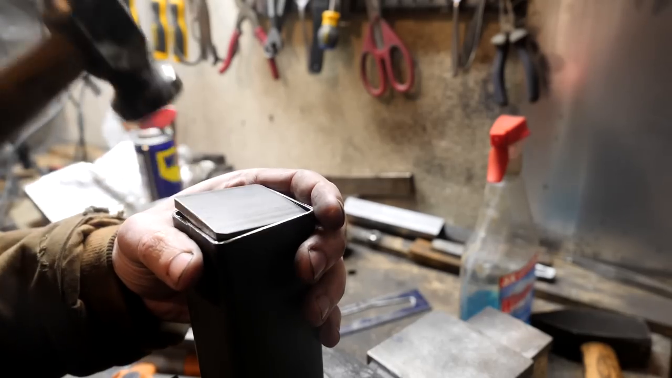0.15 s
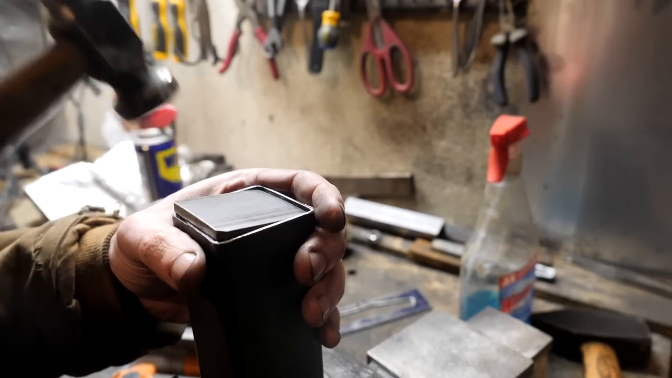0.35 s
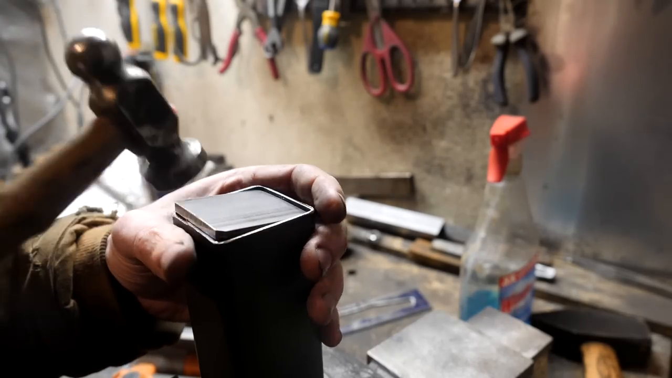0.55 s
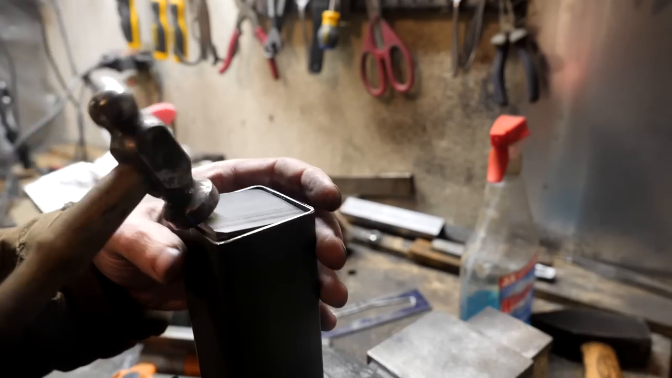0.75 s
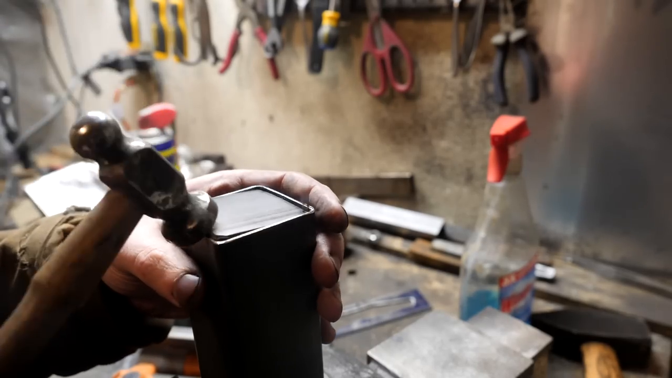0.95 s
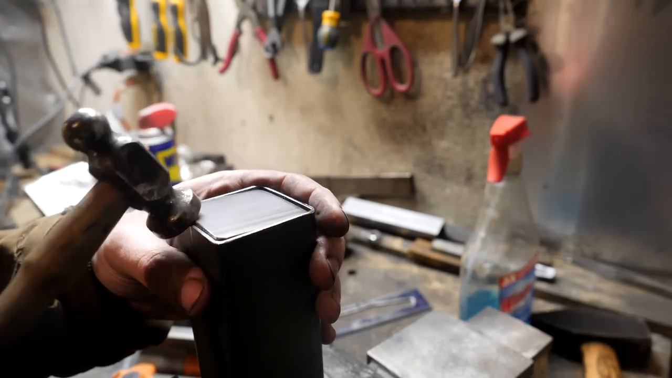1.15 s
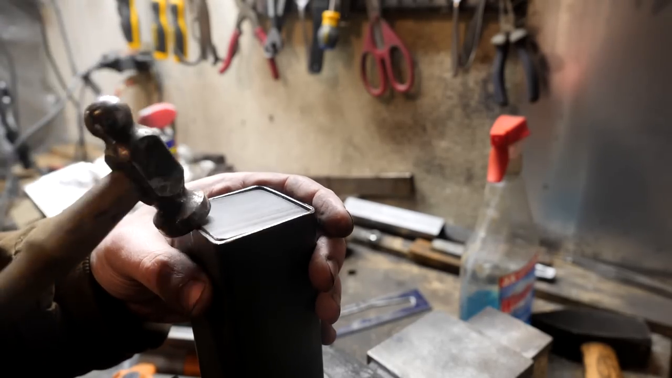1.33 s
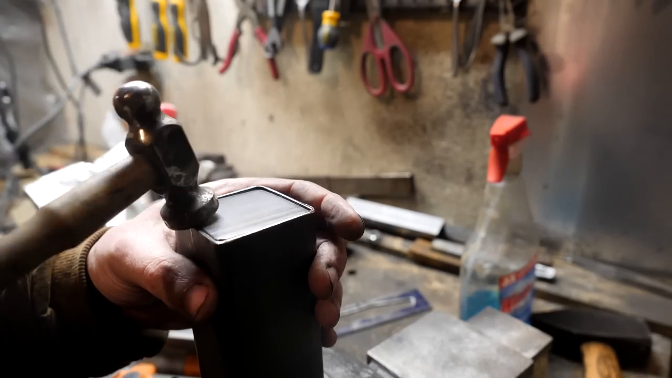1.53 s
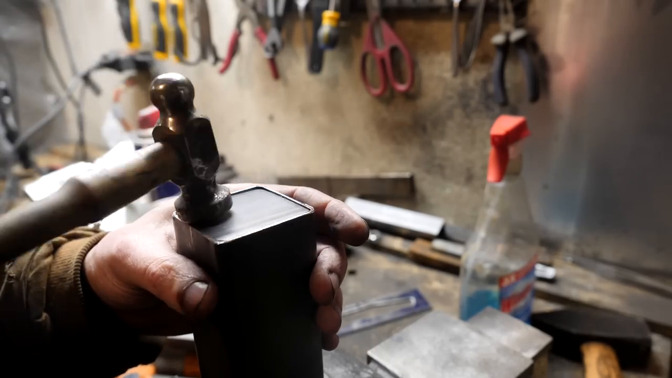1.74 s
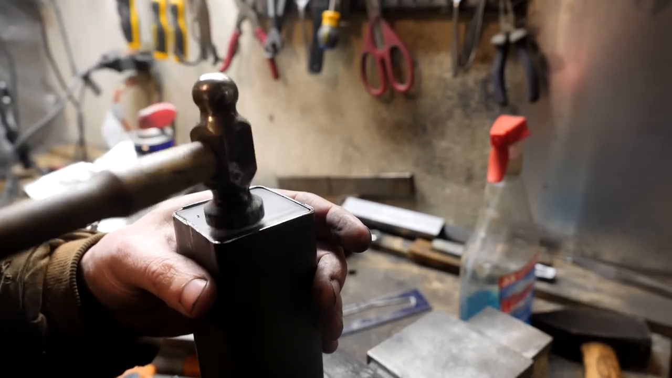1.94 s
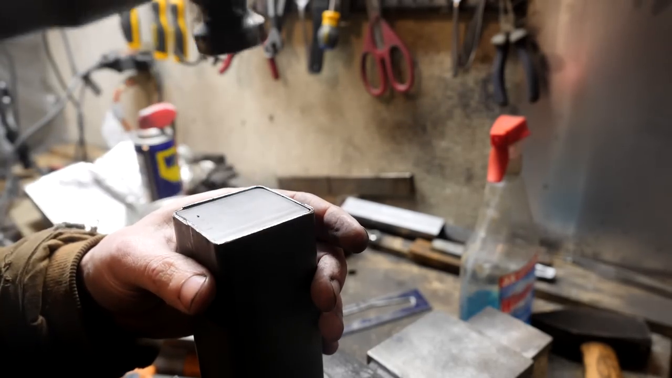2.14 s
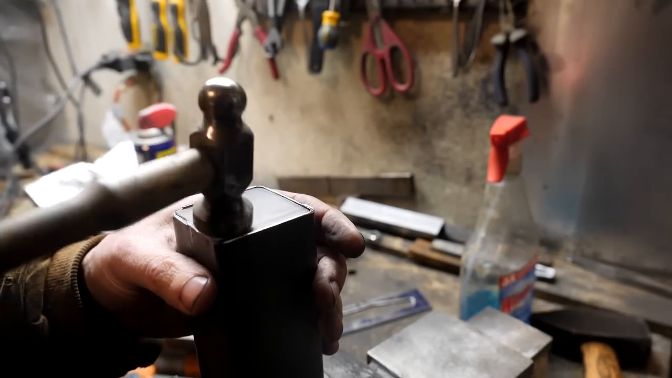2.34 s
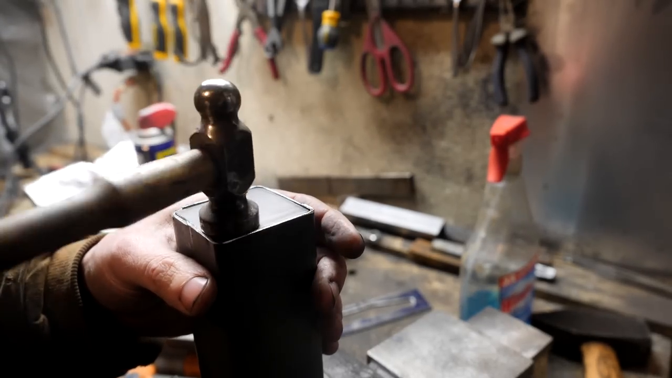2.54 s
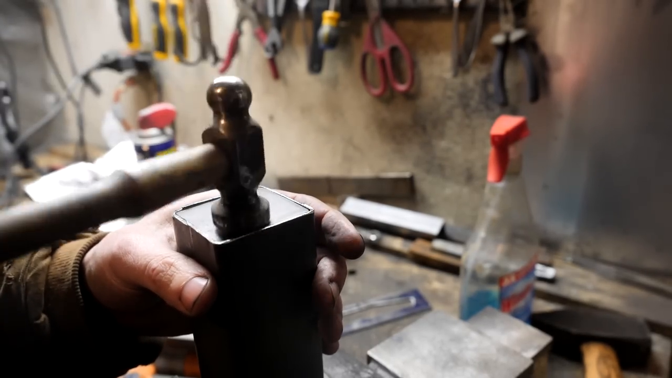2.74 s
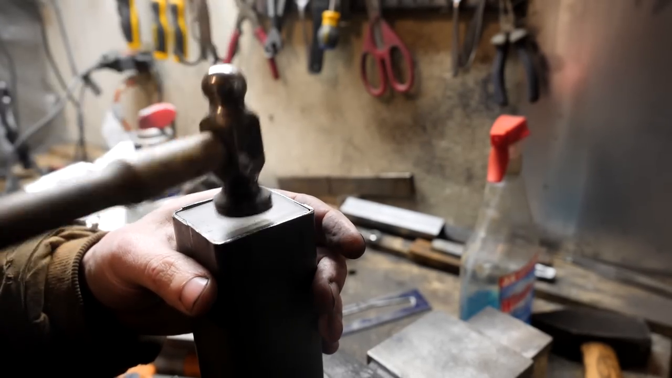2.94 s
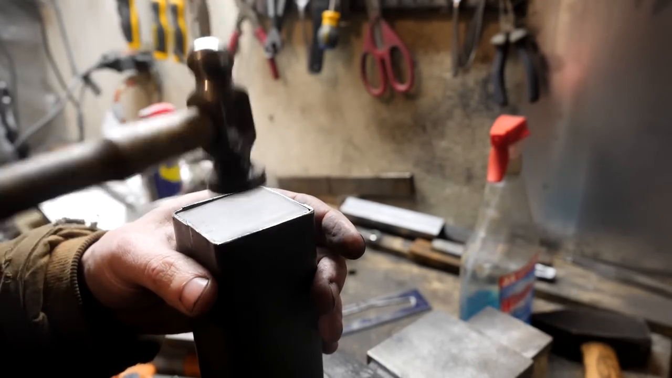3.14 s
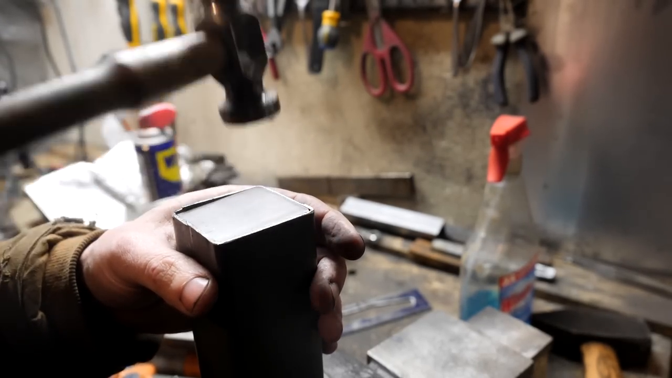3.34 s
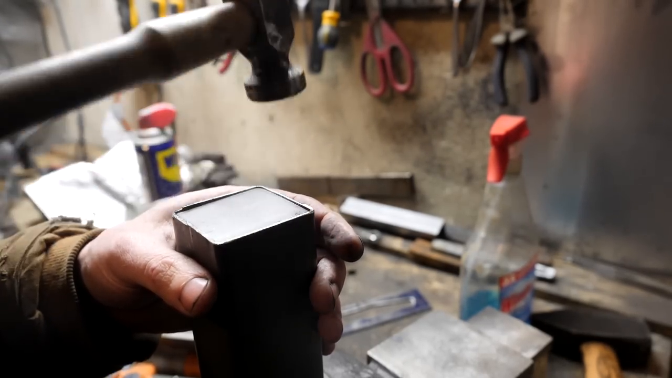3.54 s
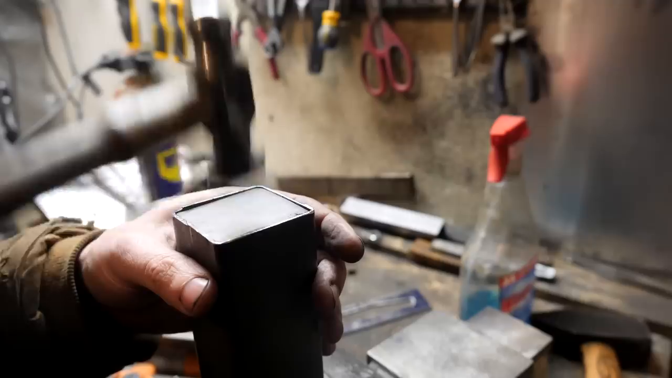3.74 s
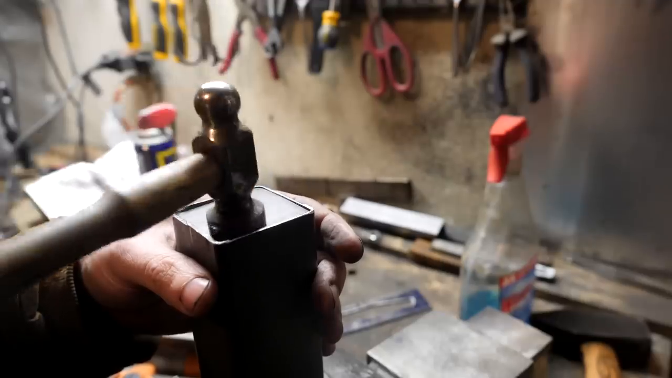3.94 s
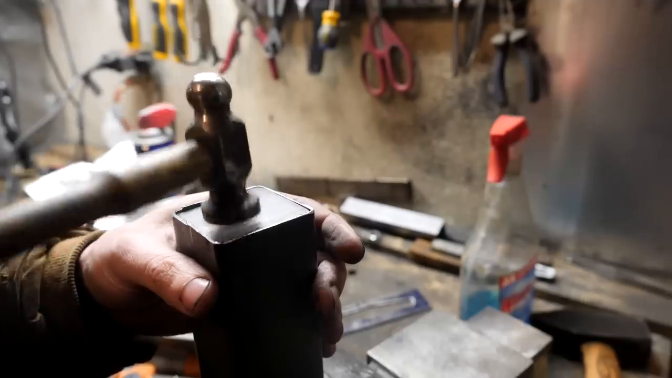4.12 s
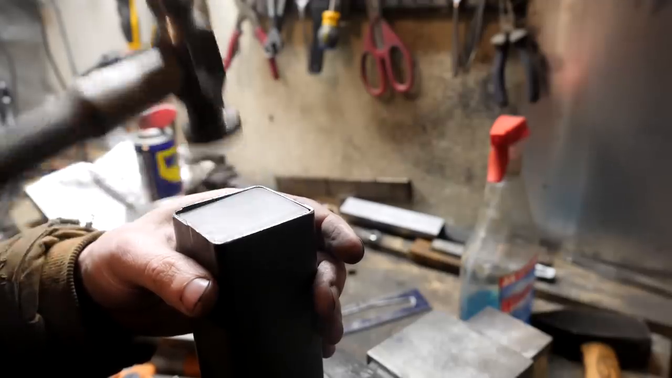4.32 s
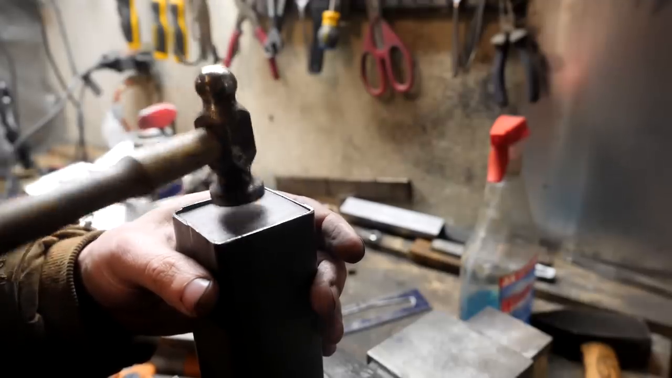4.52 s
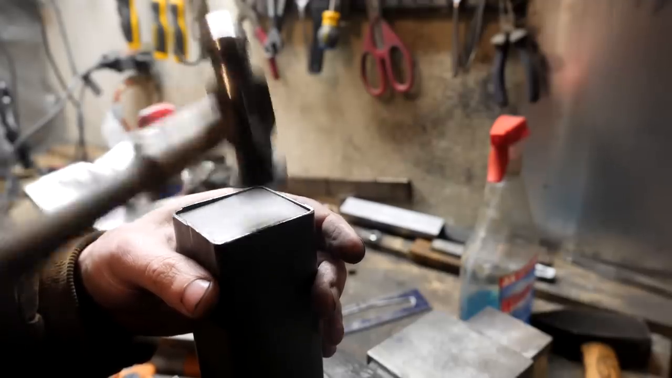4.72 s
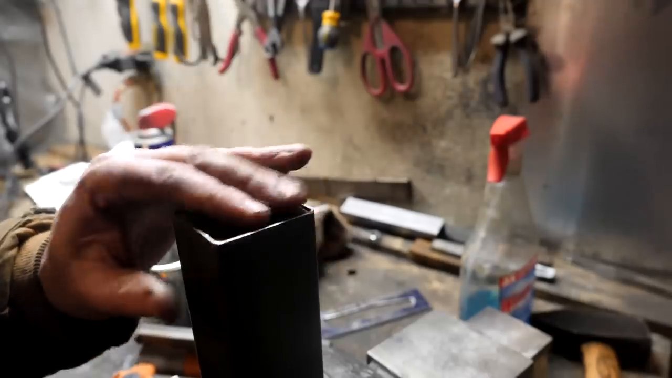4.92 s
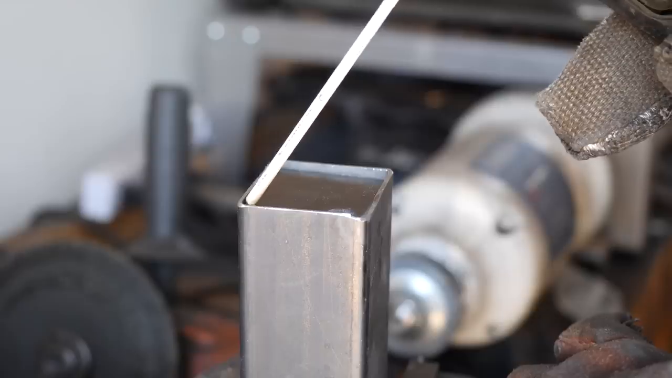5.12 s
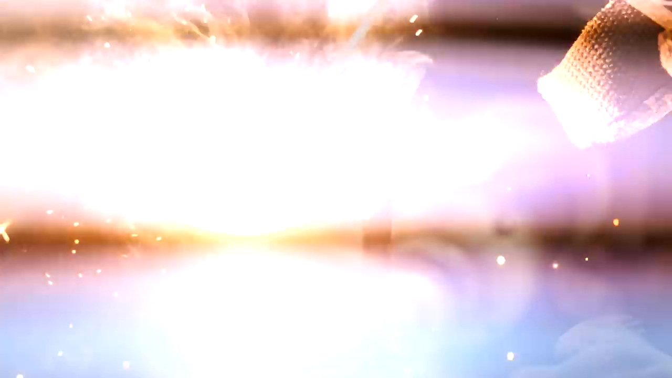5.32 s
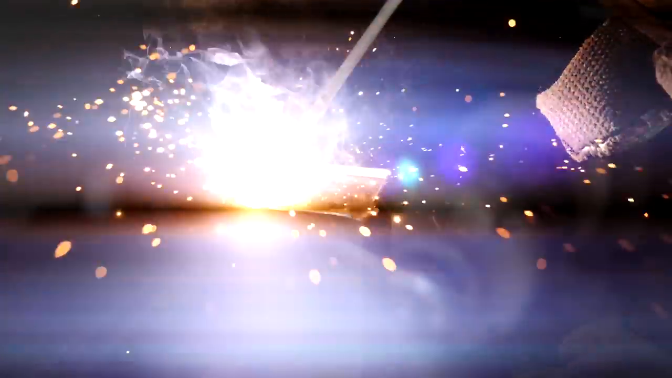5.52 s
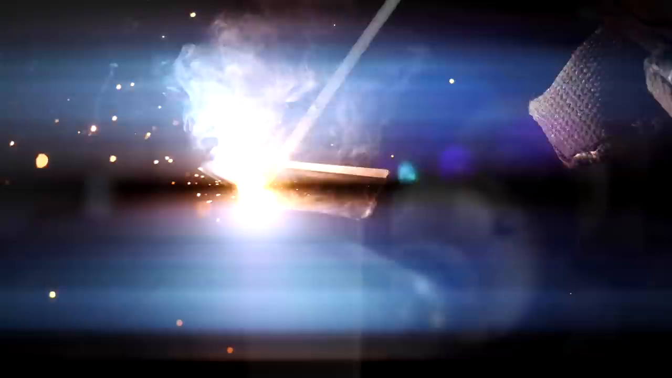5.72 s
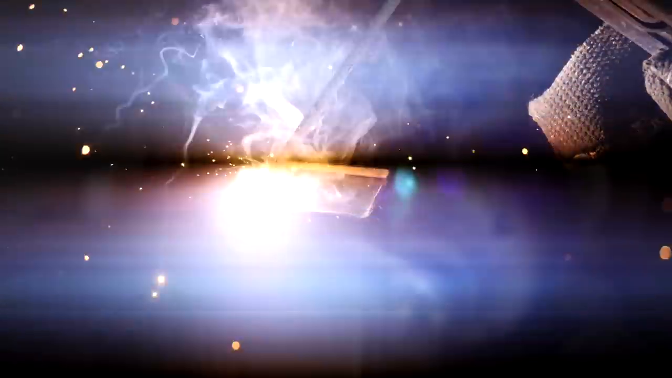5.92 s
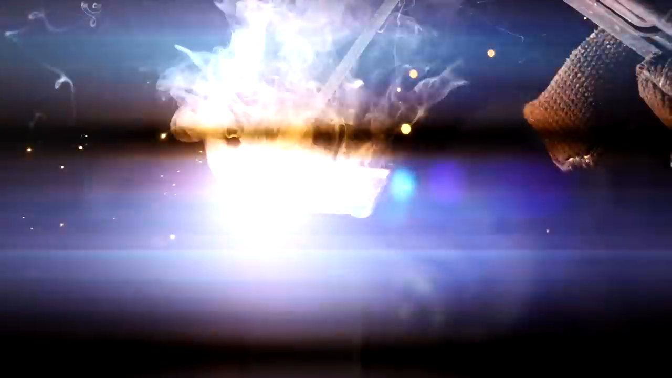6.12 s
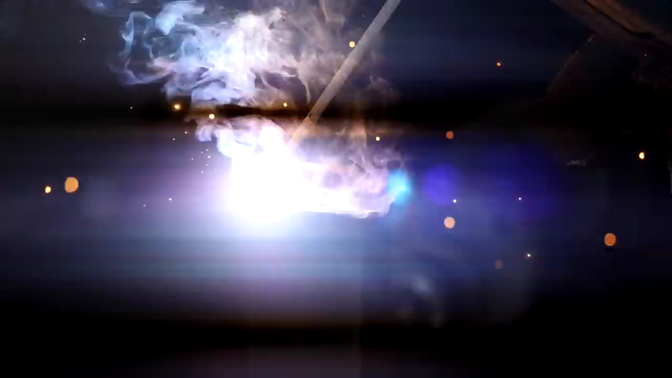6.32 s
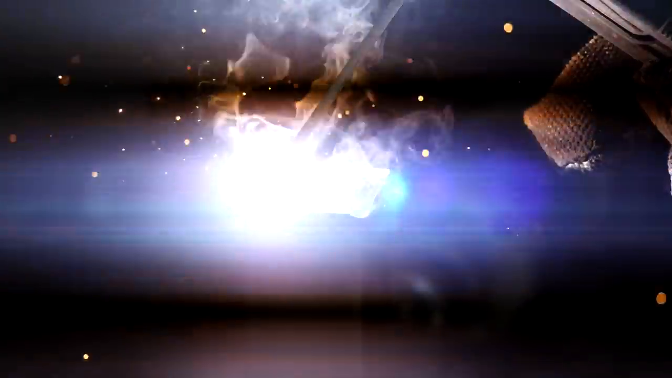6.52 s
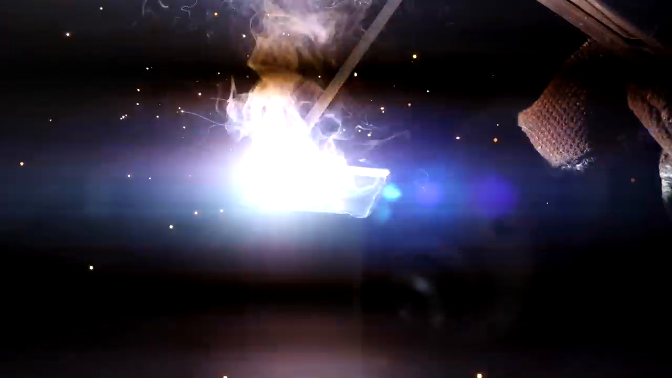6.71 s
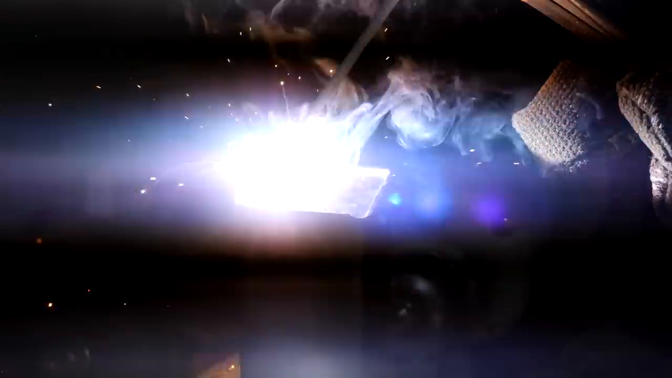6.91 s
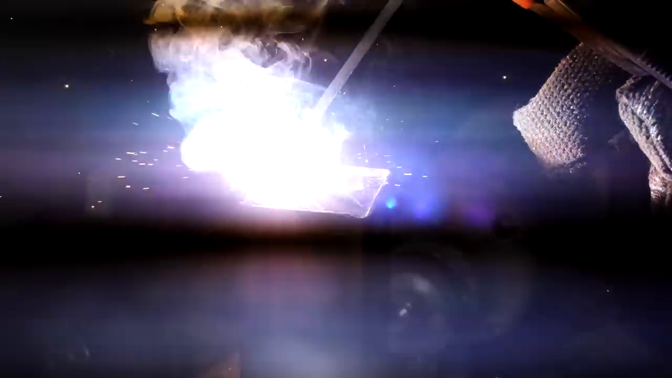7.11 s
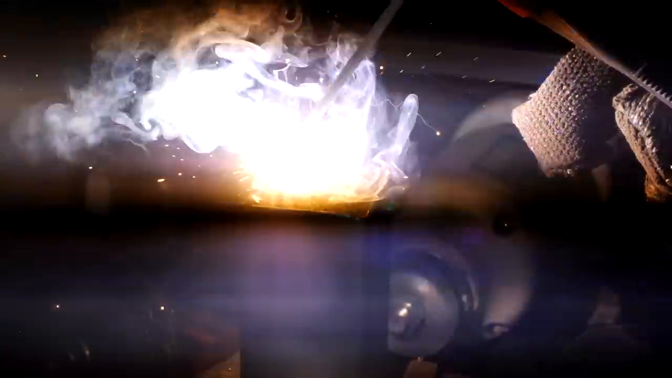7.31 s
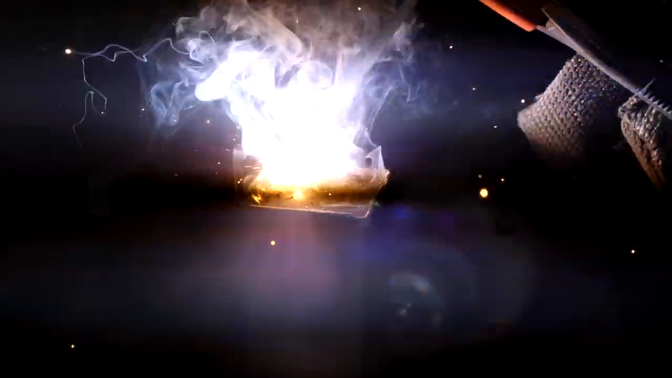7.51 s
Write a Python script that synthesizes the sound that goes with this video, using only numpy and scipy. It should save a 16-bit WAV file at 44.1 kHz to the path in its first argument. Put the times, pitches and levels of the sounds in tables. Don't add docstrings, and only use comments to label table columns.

```python
import sys
import numpy as np
from scipy import signal
from scipy.fft import rfft
from scipy.io import wavfile
from scipy.ndimage import uniform_filter1d

SR = 44100
rng = np.random.default_rng(int(sys.argv[2]) if len(sys.argv) > 2 else 0)


def inscribe(sig):
    pcm = np.round(np.clip(np.atleast_2d(sig).T, -1, 1) * 32767)
    wavfile.write(sys.argv[1], SR, pcm.astype(np.int16))


def volts_from_db(level):
    exponent = np.asarray(level, float) / 20
    return 10 ** exponent


N = 337806
CUT_S = 5.1515


def evened(x):
    return x / np.sqrt(np.mean(x ** 2) + 1e-20)


def read(points, hz):
    f, value = np.transpose(points)
    return np.interp(np.log(hz + 1), np.log(f + 1), value)


def curves(rows):
    s, *columns = np.transpose(rows)
    return [np.interp(np.arange(N) / SR, s, c) for c in columns]


def add(mix, s, sound):
    part = mix[..., round(s * SR):][..., :sound.shape[-1]]
    part += sound[..., :part.shape[-1]]


def colour(x, points):
    log_gain = np.log(volts_from_db(read(points, abs(np.fft.fftfreq(4096, 1 / SR)))))
    taps = np.fft.ifft(np.exp(np.conj(signal.hilbert(log_gain)))).real[:2048]
    return signal.oaconvolve(x, taps[None], axes=1)[:, :x.shape[1]]


def paired(shape, same):
    a, b = rng.standard_normal((2, *shape))
    same = np.clip(same, 0, 1)
    return a, same * a + np.sqrt(1 - same ** 2) * b


def field(magnitude, likeness, size):
    same = read(likeness, np.fft.rfftfreq(size, 1 / SR))[:, None]
    z = np.array(paired(magnitude.shape, same)) + 1j * np.array(paired(magnitude.shape, same))
    return signal.istft(z * magnitude, nperseg=size, noverlap=size * 3 // 4)[1][:, :N] * np.sqrt(3 / size)


def steady_air(spectrum, likeness):
    shape = volts_from_db(read(spectrum, np.fft.rfftfreq(1024, 1 / SR)))[:, None] * np.ones(N // 256 + 5)
    return evened(field(shape, likeness, size=1024))


def drift(hz):
    return evened(signal.lfilter([1], [1, -np.exp(-2 * np.pi * hz / SR)], rng.standard_normal(N)))


CRACK_BAND_HZ = [850, 1700, 2850, 4700, 7600]
# (frequency [Hz], level [dB])
CRACK = [(150, -11), (500, -13.5), (1500, -8.5), (3000, -6), (7000, -1), (12000, 2), (15500, 9.5),
         (16300, -9), (17000, -52)]


def crack(plain_db, parts_db, tilt_db):
    hz, t = np.fft.rfftfreq(256, 1 / SR), np.arange(900) / SR
    burst = np.array(paired(t.shape, .93)) * volts_from_db(-60 * np.maximum(t - .001, 0) / .011)
    burst *= np.minimum(t / 0.00022, 1)
    burst += sum(gain * np.roll(burst, lag, axis=1) for lag, gain in [(100, 0.82), (200, 0.64), (310, 0.69)])
    lumpy = uniform_filter1d(abs(rfft(burst.sum(0), 2048)) ** 2, 24)[::8]
    plain_db = plain_db - 8 * np.log10(lumpy / lumpy.mean())
    band_db = read([*zip(CRACK_BAND_HZ, parts_db), (12000, 0)], hz)
    crack_db = read(CRACK, hz) + 0.78 * band_db + tilt_db * np.log2(hz / 4000 + 0.022) + 1.02 * plain_db
    return np.tanh(0.19 * evened(colour(burst, list(zip(hz, crack_db)))))


# (frequency [Hz], T60 [s], ring_db index: wall, lid, lid overtones)
TUBE = [(1550, .2, 0), (1570, .26, 0), (1590, .3, 0), (2185, .25, 1), (2715, .2, 2), (2890, .2, 2),
        (3050, .2, 2)]


def ring(ring_db, t, build):
    out = np.zeros((2, len(t)))
    beat_s, wall_hz, lag_s_per_hz = .075, 1570, .001
    for hz, t60_s, part in TUBE:
        level = volts_from_db(ring_db[round(part)] + 6.5 - 60 * (t - .08) / t60_s) * build
        flutter = evened(uniform_filter1d(rng.standard_normal((2, len(t))), 600))
        grip = 0.5 + 0.09 * (flutter[0] + 1j * flutter[1])
        turns = hz * (t - beat_s) - lag_s_per_hz / 2 * (hz - wall_hz) ** 2
        out += level * (grip * np.exp(2j * np.pi * turns)).real * volts_from_db([[-part], [part]])
    return out


# (time [s], crack peak [dB], lid looseness [dB], face bite [dB], bright spot [Hz])
RIM_BLOWS = [(0.0833, -18.5, 0, 0, 12500), (0.2913, -16, -2, 0, 11100), (0.4924, -13, 5, 5.5, 10700),
             (0.822, -16, 3.5, 3.5, 8500), (1.004, -14.5, -2.5, 2.5, 10800), (1.1977, -14.5, 7.5, 1, 11000),
             (1.4035, -13, 7, -1.5, 4400), (1.5896, -14, 11.5, 0.5, 12100), (1.779, -15, 7.5, -2, 12200),
             (1.957, -15.5, -4.5, -4, 9500)]
MIDDLE_BLOWS = [(2.3604, -16.5, 6.5, -1.5, 11840), (2.5586, -12.5, 5, 3, 3530),
                (2.7541, -14.5, -1, -3.5, 8100), (2.937, -14.5, -0.5, -1.5, 8800),
                (3.1233, -15, -1.5, -0.5, 8160), (3.303, -15, -0.5, -5.5, 7450), (3.475, -16, -5, 3, 11500),
                (3.6509, -13, 7, 4, 5240), (3.8262, -14.5, 1.5, -2.5, 7340), (3.984, -14.5, -1, -2.5, 7740),
                (4.1343, -14, -4, -0.5, 12200), (4.277, -14, -1.5, -7.5, 7400),
                (4.4126, -12.5, -2, -4.5, 6940), (4.548, -14, -1, 0, 3700), (4.679, -13, 2, 3, 7650),
                (4.8031, -13.5, 2, 1.5, 6730)]
BLOWS = RIM_BLOWS + MIDDLE_BLOWS
# (wall ring [dB], lid ring [dB], top band [dB], crack tilt [dB/octave])
LANDINGS = [(7, 1, -3, -1.5), (0, 1, -5, -2), (6, -10, 3, 3.5), (3, -1, -5, 1), (-5, 2, 1, 0.5),
            (-2.5, -7, 3, -0.5), (4, -9, -1, 0), (6, -2, 0, -1), (7.5, 3, 1, 1), (-3, 0, 7, -1.5),
            (4, 5.5, -5, -0.5), (0.5, 5.5, -5, 0), (-1.5, -0.5, 9.5, 1.5), (2, 0, 5, 1.5),
            (3.5, 1, 4, -0.5), (3, 0, 5, 2), (-2, -6, 4, 0), (-1.5, 7, 1, -1), (-3, 4, 5, 0.5),
            (5, -6, 2.5, -2), (-0.5, 1, -1, 1.5), (-8, 5, 8, 0.5), (-2, 3, 6.5, -1), (-2, 2, 0, 0.5),
            (-1, 1, 4.5, -1), (3.5, -3, 4, -0.5)]
# (thump [dB], wall [dB], lid [dB], face [dB], edge [dB])
CRACK_BANDS = [(-7, -5, -6, 1, -1), (-13, -1, -0.5, -3, -1), (18, -9, 11, -3, -2), (13.5, 1, 12, 5, 3),
               (-6, -12, 6, 1.5, -0.5), (5, -5, -4, 3, -3), (1, 2, -7, 1.5, -1), (-0.5, -3, -0.5, 3, 4),
               (4, 8, 7, 2, -3.5), (-1.5, -4, 5, 1, -3), (8, -2, 3, -3.5, 3), (5, 8, 4, 2.5, -2),
               (6, 7, 4, -4, -1), (7, 12, 8, -3, 3), (1, -7, 4, 0.5, -9), (11, -1, 12, -1, -4),
               (5, 4, 3, -3, 2), (6, 1, 6, 2, 9.5), (10, 7, 5, 0, 2.5), (-9, -17, -2, -3.5, -4.5),
               (11, 2, 7, -7, 2.5), (1, 2, 3, 0, -1), (-3.5, -11, 7.5, -3, -3), (7, 1, 7, 0, 1),
               (1, -2, 9, 0, -4), (3.5, -3, 6, -3, -6)]
# (time [s], level [dB])
SEATED = [(0, -3.5), (.6, -3), (1.5, 0.5), (1.9, 1), (2.6, 1), (3.5, -1.5), (3.85, 1), (4.4, 0.5),
          (4.8, 0.5)]
# (blow time [s], frequency [Hz], lift [dB])
TAIL_LIFTS = [(0.0833, 12700, 3), (0.2913, 1070, 6.5), (0.2914, 3730, 5), (0.4924, 2200, 5.5),
              (0.822, 3030, 4.5), (0.8221, 580, -7), (1.004, 1680, 10), (1.1977, 7600, -3), (1.1978, 3100, 1),
              (1.4035, 5340, 3.5), (1.5896, 1850, -3.5), (1.5897, 12300, 1), (1.779, 1170, -5),
              (1.7791, 7700, -3.5), (1.7792, 3470, 5.5), (1.957, 4300, 5), (2.3597, 1030, 2),
              (2.3598, 2450, 0), (2.3599, 4330, -3), (2.5584, 1050, 6), (2.7539, 1350, 0), (2.754, 2050, 4),
              (2.9365, 970, 3.5), (3.3028, 1850, 0.5), (3.475, 1160, 9.5), (3.4751, 3350, -7),
              (3.4752, 4250, -5.5), (3.6506, 7450, -1.5), (3.6507, 480, -12), (3.6508, 5640, -3),
              (4.1345, 960, -3), (4.1346, 10700, -4), (4.277, 484, -4), (4.4126, 3460, 3.5), (4.8025, 503, 4)]
# centre [Hz], plain blow [dB/kHz], change per dB of looseness, of bite [dB/dB]
BLOW_HZ = [600, 2400, 6200, 12000]
TAIL_DB = [-52, -55, -54.5, -59]
LOOSE_SHARE = [-0.11, 0.97, 0.15, -0.11]
BITE_SHARE = [-0.28, 0.1, 0.72, 0.055]
# level [dB], change per dB of looseness, of seating [dB/dB]
RING_DB = [-57.5, -57, -60]
RING_LOOSE = [0.12, 0.52, 1]
RING_SEATED = [0.47, -1, 0.11]
# (frequency [Hz], T60 [s])
SHOP = [(250, 0.28), (700, 0.35), (2000, 0.36), (5000, 0.34), (12000, 0.26), (16000, 0.2)]
# (frequency [Hz], likeness [0-1])
SHOP_SAME = [(60, 1), (180, 0.97), (550, 0.98), (1650, 0.71), (4970, 0.7), (15000, 0.82)]
# (frequency [Hz], level [dB])
TAIL_EDGES = [(60, -28), (120, -6), (170, -8.5), (270, -7.5), (300, -3.5), (420, 3.5), (515, 1.5),
              (620, -2.5), (900, 1.5)]


def hammer():
    hz, frames = np.fft.rfftfreq(256, 1 / SR), np.arange(N // 64 + 5) * 64 / SR
    power, out, t = np.zeros((len(hz), len(frames))), np.zeros((2, N)), np.arange(SR // 2) / SR
    build = 1 - np.exp(-t / 0.045)
    for blow, landing, parts_db in zip(BLOWS, LANDINGS, CRACK_BANDS):
        s, crack_db, loose_db, bite_db, spot_hz = blow
        wall_db, lid_db, top_db, tilt_db = landing
        seated_db = np.interp(s, *np.transpose(SEATED))

        tail_db = TAIL_DB + loose_db * np.array(LOOSE_SHARE) + bite_db * np.array(BITE_SHARE)
        tail_db[0] += seated_db
        bands = list(zip(BLOW_HZ + [16400], [*tail_db, tail_db[-1] - 7.5 + top_db]))
        spot_db = 5 - 0.056 * loose_db - 0.22 * bite_db
        plain_db = read(bands, hz) + spot_db * np.exp(-((hz - spot_hz) / 1200) ** 2)
        tone_db = plain_db.copy()
        for at, lift_hz, lift_db in TAIL_LIFTS:
            if abs(at - s) < .02:
                tone_db += lift_db * np.exp(-(np.log(hz / lift_hz + 1e-9) / 0.14) ** 2)
        tone_db += 1.3 * evened(uniform_filter1d(rng.standard_normal(len(hz)), 5))

        age = np.maximum(frames - s - .004, 0)
        decay_db = -60 * (age - .08) / read(SHOP, hz)[:, None]
        decay_db -= 12 * np.maximum(age - .2, 0)
        decay_db -= 35 * np.maximum(frames - 4.864, 0)
        power += np.interp(age, t, build) * volts_from_db(tone_db[:, None] + 20 + decay_db) ** 2

        ring_db = RING_DB + loose_db * np.array(RING_LOOSE) + seated_db * np.array(RING_SEATED)
        ring_db[0] += 6 * (s >= MIDDLE_BLOWS[0][0])
        ring_db += [wall_db, lid_db, lid_db / 2]
        add(out, s - .0004, volts_from_db(crack_db + 2.0) * crack(plain_db, parts_db, tilt_db))
        add(out, s, ring(ring_db, t, build))
    patches = uniform_filter1d(rng.standard_normal(power.shape), 3, 0)
    patches = evened(uniform_filter1d(patches, 30, 1))
    return out + colour(field(np.sqrt(power) * volts_from_db(1.13 * patches), SHOP_SAME, size=256), TAIL_EDGES)


RIPPLE_HZ = 240.05


def stack(hz, orders, levels_db, waver_db, locked=False):
    turns = np.cumsum(hz * np.ones(N)) / SR
    out = np.zeros(N)
    for k, db in zip(orders, levels_db):
        phase = k * hz / RIPPLE_HZ * .06 - 1 / 4 if locked else rng.random()
        level = volts_from_db(db + waver_db * drift(14)) * np.sqrt(2)
        out += level * np.sin(2 * np.pi * (k * turns + phase))
    return out


# (time [s], dive [dB])
STRIKE = (5.276, 19)
SURGE_END_S = 5.41


def surge():
    t = np.arange(N) / SR
    sag = 1 - 0.59 * (t - STRIKE[0]) / (SURGE_END_S - STRIKE[0])
    return sag * np.clip((t - STRIKE[0]) / 0.03, 0, 1) * np.clip(1 - (t - SURGE_END_S) / 0.0067, 0, 1)


# (time [s], peak [dB], low share [dB])
POPS = [(5.433, -24, -15), (5.4718, -25, -11), (5.523, -34, -29), (5.5559, -27, -25), (5.584, -29.5, -30),
        (5.6045, -22, -14), (5.617, -25, -28), (5.6366, -23.5, -30), (5.6553, -26, -23), (5.692, -26, -24),
        (5.713, -37, -30), (5.7301, -22, -18), (5.7542, -33, -19), (5.8586, -40, -28), (5.865, -24, -30),
        (5.8774, -26, -28), (5.912, -32, -25), (5.94, -26.5, -36), (5.945, -32.1, -30), (6.0026, -34, -28),
        (6.099, -21.5, -32), (6.1458, -22, -34), (6.1503, -24, -35), (6.1792, -30, -16), (6.2046, -30, -30),
        (6.2547, -27, -20), (6.275, -26.5, -30), (6.296, -22.5, -33), (6.3295, -24, -28), (6.345, -29, -30),
        (6.3676, -31, -28), (6.4383, -22.5, -17), (6.5249, -31, -26), (6.542, -31, -33), (6.5691, -30, -30),
        (6.6424, -21, -28), (6.6654, -38, -20), (6.762, -35, -27), (6.786, -22, -24), (6.8352, -25.5, -41),
        (6.9388, -32, -30), (6.9459, -27, -30), (6.984, -28, -34), (7.0776, -27, -30), (7.1109, -31, -27),
        (7.1305, -40, -26), (7.148, -33, -30), (7.1898, -32, -32), (7.2367, -25.5, -24), (7.275, -32, -32),
        (7.2874, -27, -38), (7.317, -26, -26), (7.337, -34, -30), (7.3834, -38, -27), (7.392, -30, -30),
        (7.406, -28, -31), (7.4545, -28, -30), (7.472, -31, -27), (7.5153, -28, -31), (7.5976, -28, -30)]
# (time [s], peak [dB])
CATCH_POPS = [(5.2752, -27), (5.2796, -20), (5.2816, -19), (5.2942, -31), (5.303, -31), (5.3132, -30),
              (5.3297, -30), (5.3527, -25), (5.3563, -27), (5.3608, -29), (5.3677, -24), (5.3753, -28),
              (5.382, -29), (5.3884, -30), (5.3985, -28), (5.4108, -32), (5.4238, -30)]
# (time [s], peak [dB])
TICKS = [(5.446, -35), (5.4511, -34), (5.4547, -34), (5.4802, -34), (5.4971, -33), (5.5315, -33),
         (5.5478, -33), (5.792, -33), (5.8467, -33), (5.8817, -33), (5.8863, -33), (5.8963, -34),
         (5.9602, -34), (5.9784, -35), (6.0233, -33), (6.0438, -34), (6.0776, -34), (6.1984, -34),
         (6.3084, -33), (6.3521, -34), (6.4164, -35), (6.4851, -33), (6.8146, -33), (6.8656, -34),
         (6.8959, -33), (6.9352, -34), (6.9776, -33), (7.0585, -34), (7.1691, -33), (7.1962, -33),
         (7.2025, -34), (7.3042, -35), (7.3689, -34), (7.4295, -34), (7.4917, -34)]


def spatter():
    out, t = np.zeros((2, N)), np.arange(500) / SR
    small = [(SURGE_END_S + when * (N / SR - SURGE_END_S), -46 + 8 * size, -20)
             for when, size in rng.random((50, 2))]
    for s, db, low_db in POPS + small + [(s, db, -26) for s, db in CATCH_POPS + TICKS]:
        snap = np.array(paired(t.shape, 0.78)) * (.12 * volts_from_db(-60 * t / .02) + volts_from_db(-60 * t / .0014))
        snap[:, 0] = 3.5 * np.sign(snap[0, 0])
        snap += .45 * np.roll(snap, 46, axis=1)
        snap = colour(snap, [(300, low_db), (1500, low_db + 20), (4000, 0.5), (8000, 8), (12500, 2.5),
                             (16500, -2)])
        add(out, s, volts_from_db(db + .5) * snap / abs(snap).max())
    return out


# (frequency [Hz], likeness [0-1])
ARC_SAME = [(60, 0.53), (150, 0.29), (380, 0.8), (950, 0.95), (2380, 0.93), (3900, 0.69), (5980, 0.8),
            (15000, 0.71)]
# (frequency [Hz], level [dB/Hz])
HISS = [(400, -72), (2000, -11.5), (3400, -4.5), (3900, -13.5), (4400, 1.5), (5200, -12.5), (5750, -3.5),
        (8500, 0), (11600, -3), (12200, -9), (13400, 0), (14300, -1.5), (15000, -5), (15700, -3)]


def arc_hiss(hiss_db, ripple):
    chop = 1 + 0.073 * np.cos(2 * ripple) + 0.21 * np.cos(ripple / 2)
    sparks = volts_from_db(4.5 * np.minimum(rng.exponential(1, N), 2.7))
    sparks *= (rng.random(N) < 350 / SR) * rng.choice([-1, 1], N)
    patches = uniform_filter1d(rng.standard_normal((129, N // 64 + 5)), 5, 0)
    patches = uniform_filter1d(patches, 50, 1)
    fizz = field(volts_from_db(2.3 * evened(patches)), ARC_SAME, size=256) * chop * volts_from_db(1.4 * drift(60))
    hiss = volts_from_db(hiss_db + 0.5) * evened(colour(fizz + .55 * evened(sparks), HISS))
    return hiss + volts_from_db(hiss_db - 23) * stack(RIPPLE_HZ, [31, 36], [0, 0], waver_db=1)


# (time [s], level [dB])
GAIN = [(5.16, 10.5), (5.265, 8.5), (5.29, -2), (5.4, 0), (5.45, -3), (5.57, 4), (5.64, -0.5), (5.7, 2),
        (5.73, -0.5), (5.77, 1.5), (5.95, 0), (6.15, 0), (6.5, 1), (6.8, -1.5), (7.25, -1), (7.39, 2),
        (7.55, -1.5), (7.66, 1)]
# (time [s], level [dB])
SIZZLE = [(5.44, 0.5), (5.72, -1), (5.88, 0), (6.2, 0), (6.6, -1), (6.66, 0), (6.8, -2), (7.4, 1.5),
          (7.56, -4)]
# multiple of RIPPLE_HZ, level [dB]
RIPPLE_ORDERS = [3, 4, 5, 6, 8, 9, 10, 12]
RIPPLE_DB = [-4.5, 3, -13, -9.5, -22, -16.5, -16, -13]
# delay [samples], level [dB]
ECHO_SAMPLES = [16, 30, 46, 76, 107]
ECHO_DB = [-14, -31, -12.5, -45, -6.5]


def arc():
    (gain_db,), (sizzle_db,) = curves(GAIN), curves(SIZZLE)
    t, surging = np.arange(N) / SR, surge()
    idle = np.clip((STRIKE[0] - t) / 0.005, 0, 1)
    buzz_db = -54.5 + 1.22 * gain_db - 8 * idle + 12.5 * surging
    low_db = -10 + 0.43 * gain_db + 12.5 * surging - idle
    hiss_db = -48.5 + sizzle_db - 19 * idle + 5 * surging
    held_db = -15 * (t < SURGE_END_S)
    levels_db = [RIPPLE_DB[0] + held_db, *RIPPLE_DB[1:]]
    buzz = stack(RIPPLE_HZ, RIPPLE_ORDERS, levels_db, waver_db=1.3, locked=True)
    buzz += volts_from_db(low_db) * stack(2 * RIPPLE_HZ, [1], [0], waver_db=2, locked=True)
    overtones = volts_from_db(-59.5) * surging * stack(RIPPLE_HZ, [6, 8], [6, -4], waver_db=5.5, locked=True)

    ripple = 2 * np.pi * RIPPLE_HZ * np.arange(N) / SR
    hiss = arc_hiss(hiss_db, ripple) + spatter()
    echoes = sum(volts_from_db(db) * np.roll(hiss, k, axis=1) for k, db in zip(ECHO_SAMPLES, ECHO_DB))

    since, spit_peak_s = t - 5.308, 5.3132
    cycle = (ripple - 2 * np.pi * RIPPLE_HZ * spit_peak_s) / 4
    spits = -sum(np.cos(k * cycle) for k in range(8, 30))
    spits *= np.clip(since / 0.0069, 0, 1) * np.exp(-abs(since) / 0.03)
    return volts_from_db(buzz_db) * buzz + overtones + volts_from_db(-54) * spits + hiss + echoes


# multiple of blade pitch, level [dB]
FAN_ORDERS = [2, 4, 7, 9]
FAN_DB = [1.5, 0.5, -12, -8]
# (frequency [Hz], level [dB])
FAN_AIR = [(100, -57), (330, -14.5), (450, -7.5), (900, 2), (1600, -1.5), (2500, -9), (3400, -6.5),
           (3900, -7), (8000, -21)]


def fan():
    gain_db, = curves(GAIN)
    whine_db = -60.5 + 1.1 * gain_db + 4 * surge()
    air_db = -60.5 + 0.69 * gain_db + 11 * surge()
    air = volts_from_db(air_db + 5.5) * steady_air(FAN_AIR, ARC_SAME)
    blade_hz = 377.6 * (1 + 0.001406 * drift(2.56))
    return volts_from_db(whine_db) * stack(blade_hz, FAN_ORDERS, FAN_DB, waver_db=2.0) + air


# (frequency [Hz], width [Hz], depth [dB], depth wander [dB])
NOTCHES = [(3950, 100, -9, 18), (4710, 270, -10, 4), (5260, 59, 3, -2), (12800, 300, -1, 0)]


def bench_cancel(x):
    hz, t, z = signal.stft(x, SR, nperseg=512, noverlap=384)
    at = np.minimum((t * SR).astype(int), N - 1)
    cut_db = 0
    for f, width, db, wander_db in NOTCHES:
        depth_db = np.minimum(db + wander_db * drift(2.7)[at], 0)
        centre_hz = f * (1 + 0.011 * drift(1.5)[at])
        cut_db = cut_db + depth_db * np.exp(-((hz[:, None] - centre_hz) / width) ** 2)
    return signal.istft(z * volts_from_db(cut_db), SR, nperseg=512, noverlap=384)[1][:, :N]


KNOCK_S = [3.8808, 3.902, 3.904, 3.9045, 3.905, 3.914, 3.929, 3.9292, 3.93, 3.9315, 3.934, 3.945, 3.948,
           3.954, 3.957, 3.958, 3.963, 3.967, 3.972, 3.982]
# (level [dB], pitch [Hz], T60 [s])
KNOCKS = [(-19.5, 310, 0.037), (-26, 3240, 0.016), (-30, 6150, .06), (-25, 5250, .045), (-26.5, 1690, .024),
          (-33, 300, 0.037), (-11.5, 570, .0091), (-38, 3480, 0.14), (-31, 270, 0.06), (-28, 1130, 0.032),
          (-33, 1800, .012), (-30, 400, 0.044), (-44, 240, .05), (-17, 496, .0087), (-34, 1600, .012),
          (-31, 990, 0.03), (-34, 250, 0.046), (-37, 360, 0.065), (-32, 810, .026), (-36, 1200, .058)]
# (time [s], level [dB], half length [s], centre [Hz])
BRUSHES = [
    (2.296, -65, 0.018, 5030),
    (5.065, -56.5, 0.011, 8500),
    (5.093, -61, 0.0055, 8950),
    (5.143, -62, 0.016, 9000),
]


def bench():
    out, t = np.zeros((2, N)), np.arange(6000) / SR
    for s, (db, hz, t60_s) in zip(KNOCK_S, KNOCKS):
        add(out, s, volts_from_db(db - 60 * t / t60_s) * np.minimum(t * hz / 0.72, 1) * np.sin(2 * np.pi * hz * t))
    for s, db, half_s, hz in BRUSHES:
        rub = colour(np.array(paired(t.shape, 0.58)), [(hz / 3, -22), (hz / 1.1, 0), (15600, -5)])
        add(out, s - .068, volts_from_db(db) * evened(rub) * np.exp(-((t - .068) / half_s) ** 2))
    return out


# (time [s], pitch [Hz], level [dB])
FAR_WHINE = [(0, 1100, -66), (.08, 1040, -68), (.75, 1090, -75), (2.19, 1090, -68), (2.26, 1150, -71),
             (2.35, 1090, -73), (4.95, 1150, -65), (5.1, 1050, -68), (5.13, 1030, -80)]
# (frequency [Hz], level [dB/Hz])
QUIET = [(70, -32), (130, -1), (280, -9.5), (450, -9), (800, -15), (1100, -1.5), (1500, -22), (3400, -27),
         (15500, -28)]


def shop_air():
    hz, whine_db = curves(FAR_WHINE)
    turn = 2 * np.pi * np.cumsum(hz) / SR
    whine = volts_from_db(whine_db + drift(14)) * np.sqrt(2) * (np.sin(turn) + 0.039 * np.sin(2 * turn))
    return volts_from_db(-68.5) * steady_air(QUIET, SHOP_SAME) + whine


def scene():
    after = np.arange(N) >= CUT_S * SR
    before = hammer() + bench() + shop_air()
    return np.where(after, bench_cancel(fan() + arc()), before)


def thud(db):
    t = np.arange(1500) / SR
    jolt = signal.lfilter([1], [1, -np.exp(-2 * np.pi * 150 / SR)], np.array(paired(t.shape, 0.71)))
    return volts_from_db(db - 60 * t / 0.035) * evened(jolt)


def dips(peaks, dive_s, recover_s):
    t, dip_db = np.arange(SR // 2) / SR, np.zeros(N)
    for s, depth_db in peaks:
        add(dip_db, s + 0.00054, depth_db * (1 - np.exp(-t / dive_s)) * np.exp(-t / recover_s))
    return dip_db


def low_pass(x, taps, edge_hz, beta):
    return signal.oaconvolve(x, signal.firwin(taps, edge_hz, window=("kaiser", beta), fs=SR)[None], "same")


def roll_off(x):
    return signal.sosfilt(signal.butter(12, 16980, fs=SR, output="sos"), x)


def record(dry):
    x = signal.sosfilt(signal.butter(4, 165, "high", fs=SR, output="sos"), dry)
    sharp = np.zeros(N)
    for s, *_ in BLOWS:
        add(x, s, thud(db=-57))
        add(sharp, s - .003, np.hanning(400))
    for s, db, _ in POPS:
        add(x, s - .004, thud(db=db - 40.5))
        add(sharp, s - .004, np.hanning(520) * volts_from_db(3.6 * (db + 15.0)))

    dip_db = dips([(row[0], 26) for row in BLOWS] + [(3.93, 1)], dive_s=0.006, recover_s=0.058)
    dip_db += dips([(s, 0.79 * max(db + 36.0, 0)) for s, db, _ in POPS], dive_s=0.00068, recover_s=0.0068)
    dip_db += dips([STRIKE], dive_s=0.00099, recover_s=0.0096)
    ceiling = .2
    x = ceiling * np.tanh(x * volts_from_db(-dip_db) / ceiling)

    rumble = colour(np.array(paired((N,), 0.52)), [(20, -46), (90, -44.5), (160, -81.0)])
    rumble_db = np.where(np.arange(N) < CUT_S * SR, -30., -22.) + 2.8 * drift(5)
    x = x + volts_from_db(rumble_db) * rumble

    dull = low_pass(x, taps=801, edge_hz=15800, beta=9)
    x = dull + np.minimum(sharp, 1) * (x - dull)
    x = low_pass(x, taps=201, edge_hz=16800, beta=8)
    return roll_off(x)


dry = scene()
out = record(dry)
inscribe(out)
```